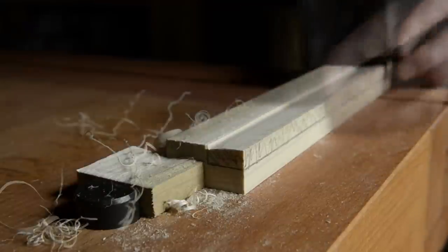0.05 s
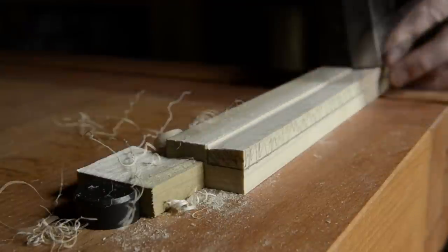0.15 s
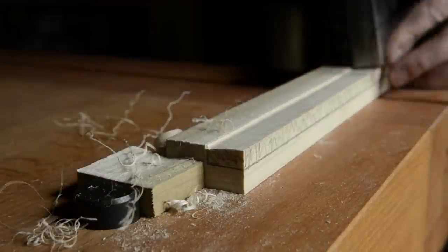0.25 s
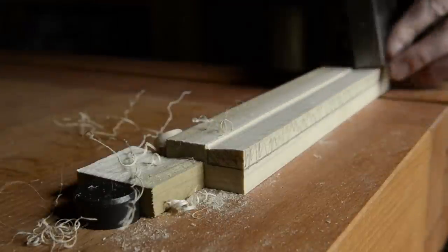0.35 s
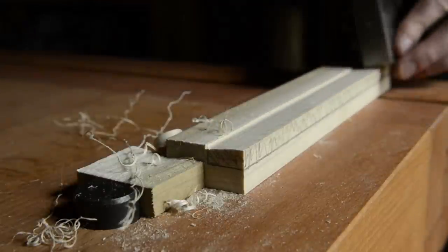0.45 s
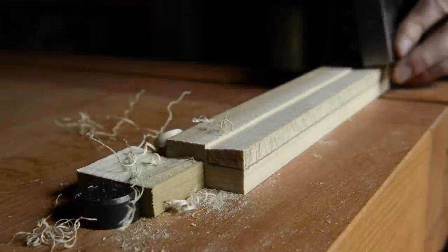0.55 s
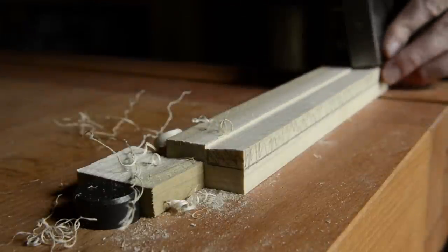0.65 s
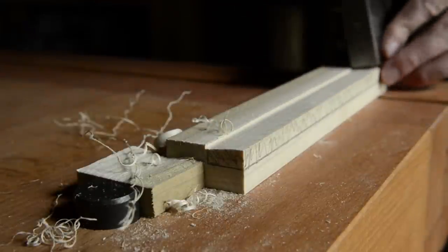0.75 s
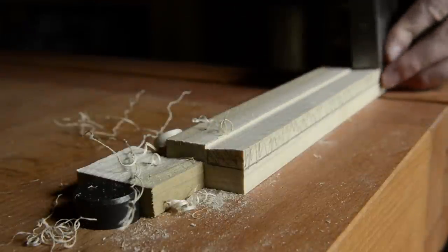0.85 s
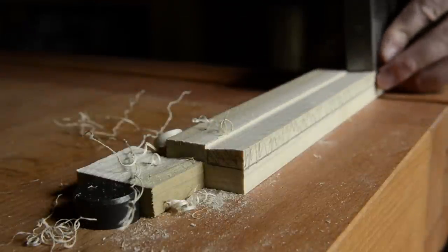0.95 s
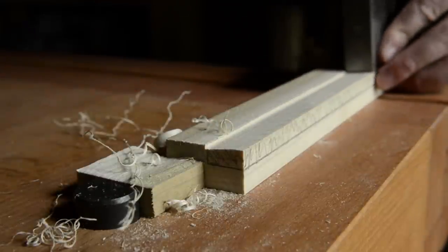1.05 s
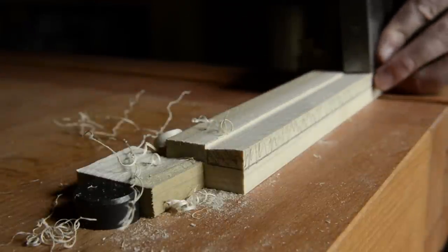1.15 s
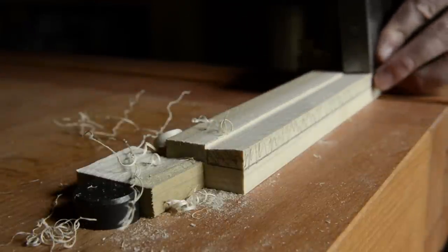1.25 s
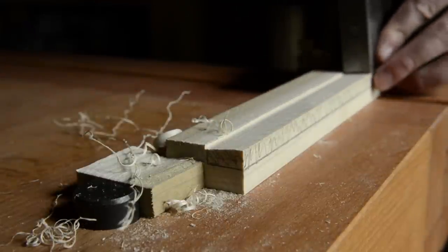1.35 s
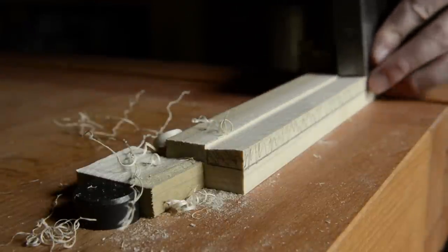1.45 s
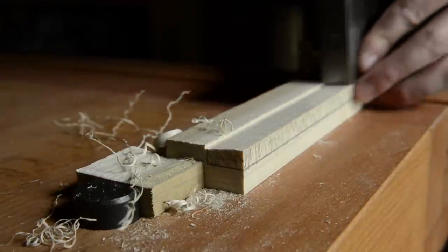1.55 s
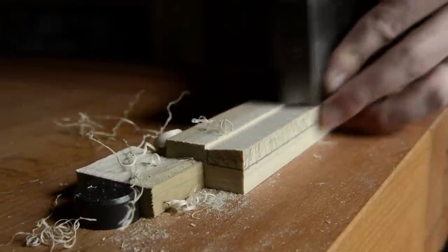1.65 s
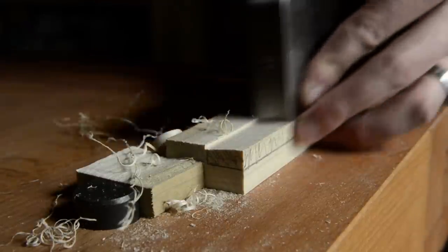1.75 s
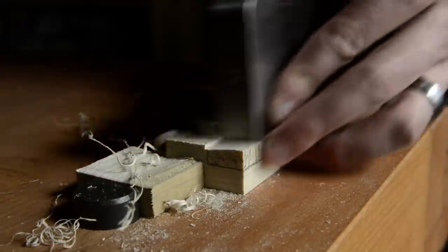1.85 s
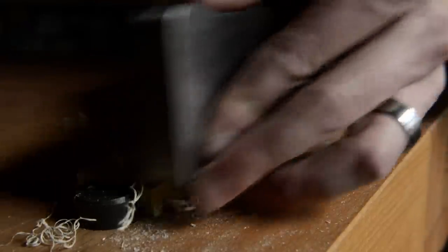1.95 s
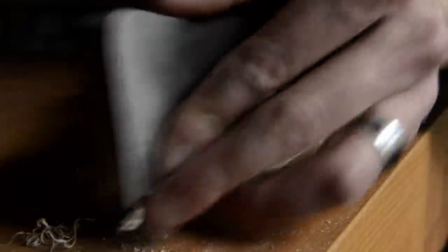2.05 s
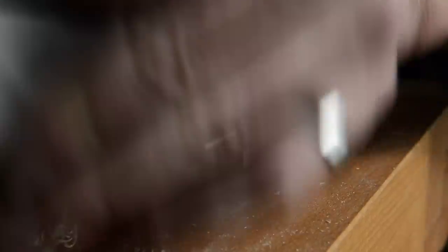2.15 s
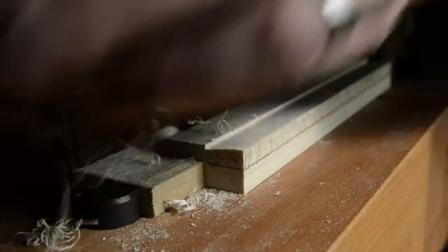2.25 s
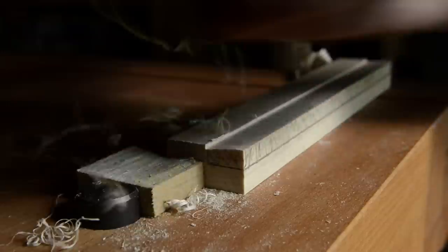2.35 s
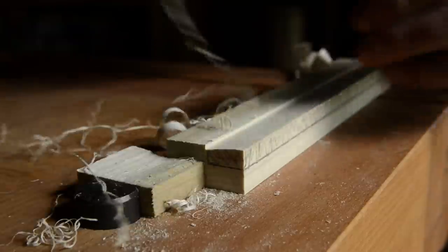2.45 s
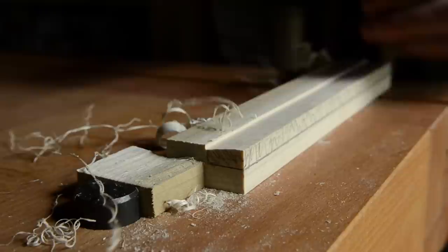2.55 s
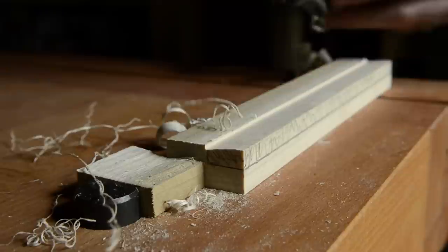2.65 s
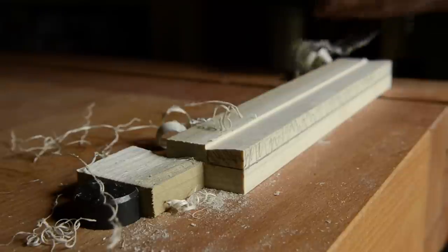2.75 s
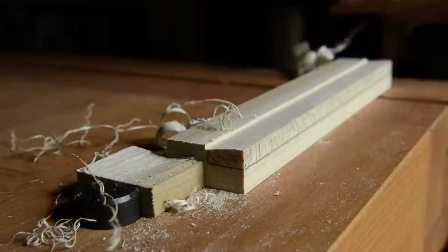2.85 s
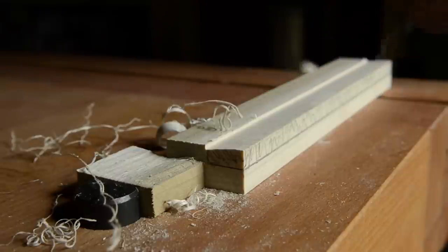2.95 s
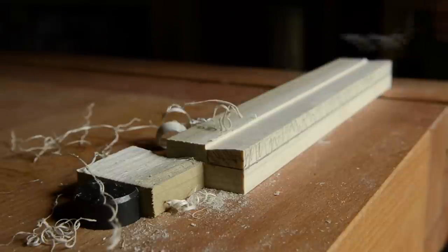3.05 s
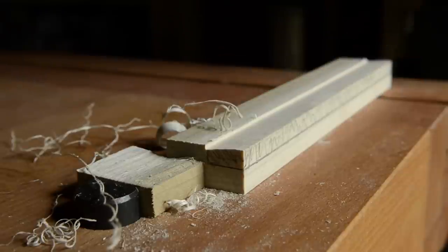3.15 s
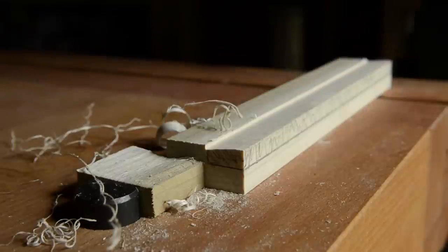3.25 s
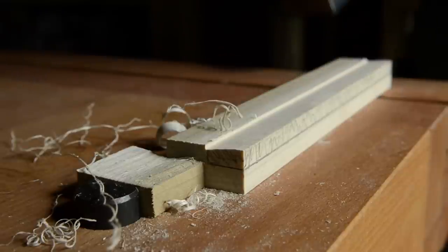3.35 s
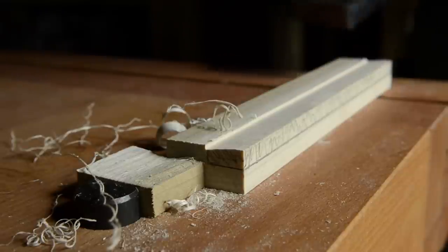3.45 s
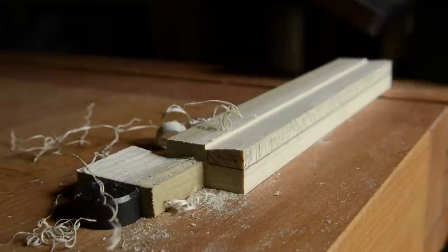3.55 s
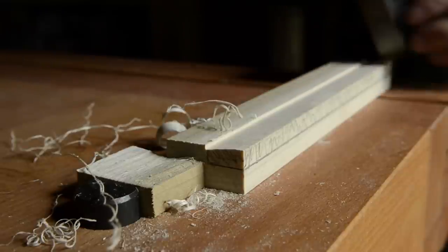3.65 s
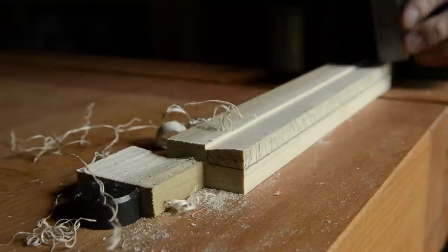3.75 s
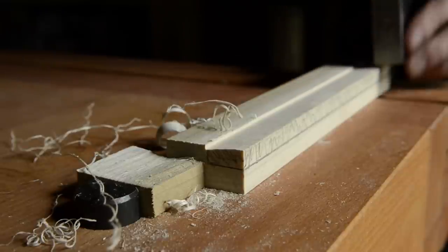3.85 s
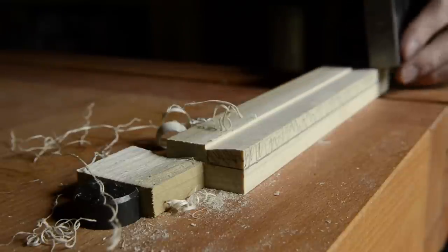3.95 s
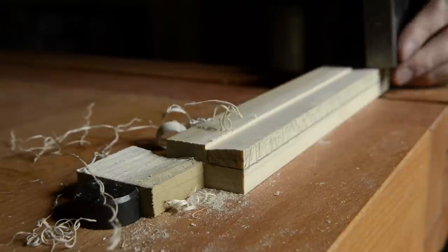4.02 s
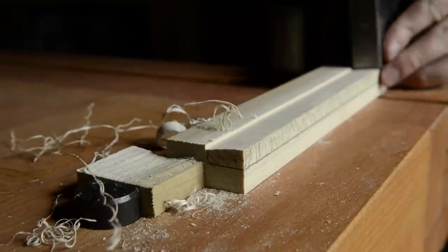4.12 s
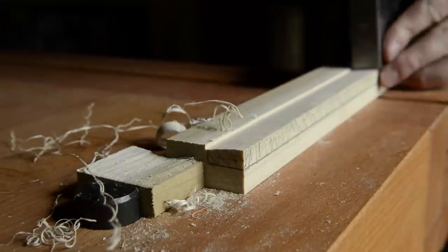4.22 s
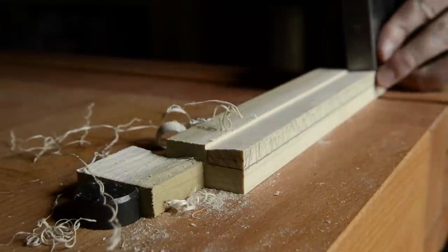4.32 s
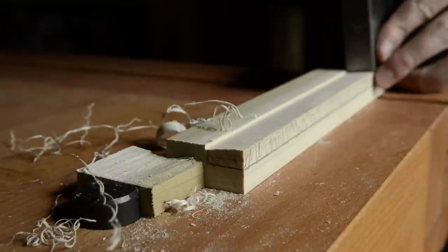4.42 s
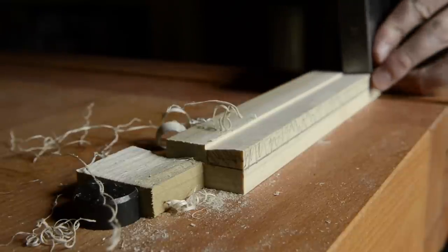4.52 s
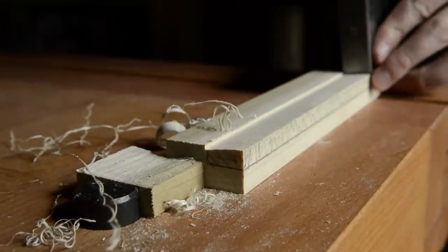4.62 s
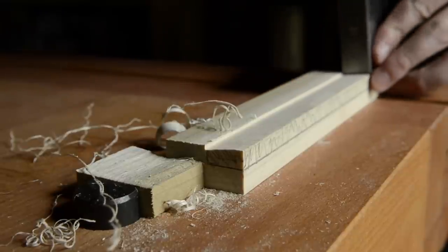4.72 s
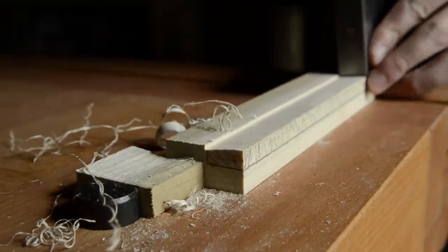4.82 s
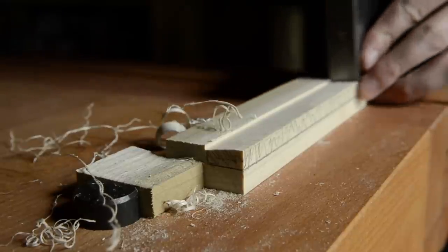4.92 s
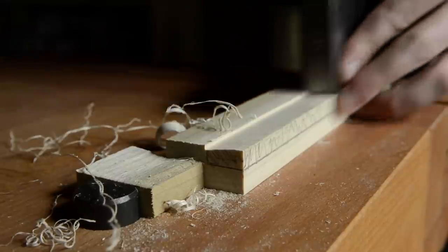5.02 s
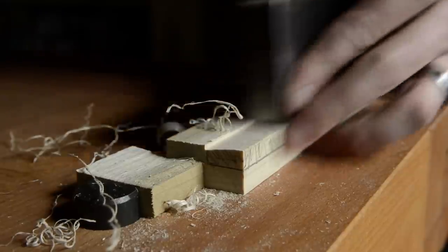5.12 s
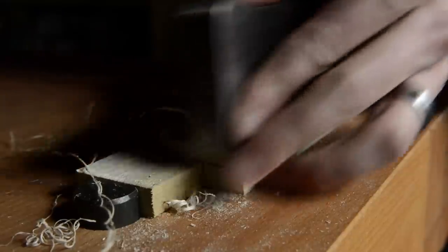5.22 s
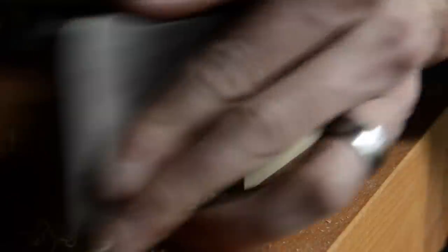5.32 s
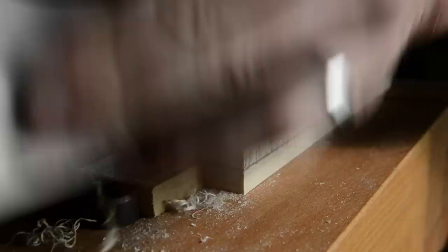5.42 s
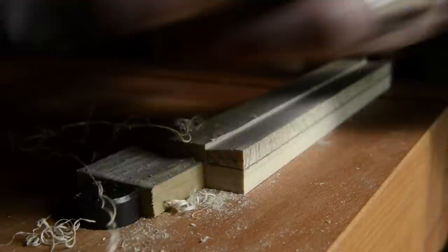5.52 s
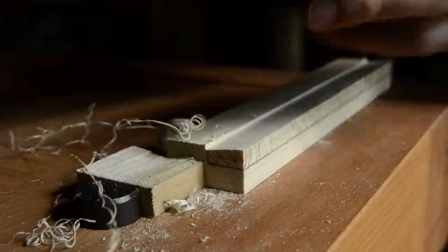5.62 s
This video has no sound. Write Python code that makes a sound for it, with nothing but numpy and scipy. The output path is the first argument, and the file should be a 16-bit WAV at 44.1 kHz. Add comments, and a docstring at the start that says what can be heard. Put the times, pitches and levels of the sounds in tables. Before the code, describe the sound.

A steel scraping blade knocks onto a wooden board, rasps along its edge in two harsh strokes, with knocks and crackling shavings between.

```python
"""Workshop hum, then a steel scraping blade knocking on a narrow board as it is set down on a workbench.
It slides lightly, then is drawn along the edge twice: torn fibres drive resonances of blade and board.
The blade drops off the end and knocks on the wood; knocks are decaying modes plus filtered noise bursts.
Between the strokes the tool is seated again and fingers pull crackling shavings off it: noise grains and snaps."""
import sys
import numpy as np
from scipy import signal
from scipy.fft import rfft, irfft, next_fast_len
from scipy.io import wavfile
from scipy.ndimage import map_coordinates

SR = 44100
rng = np.random.default_rng(int(sys.argv[2]) if len(sys.argv) > 2 else 0)


def transcribe(signal):
    """Save signal, clipped to [-1, 1], as a 16-bit WAV file at the path in sys.argv[1]."""
    frames = np.atleast_2d(signal).T
    limited = np.clip(frames, -1, 1)
    pcm = np.round(limited * 32767).astype(np.int16)
    wavfile.write(sys.argv[1], SR, pcm)


N = 250472
TIME = np.arange(N) / SR

# Levels are relative settings, ahead of the mix gains, room and microphone.
# hum and whine tones: [f/Hz, level/dB]
HUM_TONES = [(59.2, -62.5), (242.2, -64), (398.4, -69), (1814, -69), (3295, -73.5), (3634, -71)]
# still-air noise spectrum: [f/Hz, density/dB]
AIR_SPECTRUM = [(15, -24), (25, 0), (119, -10.5), (253, -10), (331, -9.5), (389, -10.5), (631, -13),
                (703, -12.5), (1110, -15.5), (1800, -16), (1950, -19), (3630, -23.5), (4150, -30),
                (8810, -29.5), (15500, -50)]
# tool on wood: [t/s, level/dB, then boom/dB, wood/dB, crack/dB, steel/dB re level]
KNOCK_EVENTS = [(0.146, -4, -22.5, -10.5, -17, -30), (0.641, -14, -19, -14, -27, -15),
                (1.233, -23, -27, -10.5, -40, -33), (2.095, -9.5, -32.5, -16, -12, -18),
                (2.167, -17.5, -35, -31, -10, -22), (3.606, -40, -18, -6, -12.5, -23),
                (3.921, -20, -18.5, -8, -16.5, -29.5), (4.135, -22, -11, -17, -25, -17),
                (4.525, -13.5, -25.5, -12, -34, -37), (5.354, -12, -37, -16.5, -19.5, -18)]
# board slapping down on the bench: [t/s, level/dB, f/Hz, t60/s]
SLAP_EVENTS = [(0.651, -24, 219.5, 0.17), (0.668, -36, 168, 0.089), (1.264, -24, 394, 0.052),
               (2.097, -9, 235.2, 0.115), (2.099, -8.5, 378, 0.059), (3.607, -34, 942, 0.095),
               (4.545, -17.5, 432, 0.05), (5.361, -18, 235, 0.13)]
# blade set ringing by a catch on the board's end: [t/s, level/dB, favoured f/Hz]
RING_EVENTS = [(0.641, -31, 1780), (4.136, -41.5, 3343)]
# low bench modes: [f/Hz, level/dB, t60/s]
BENCH_MODES = [(96, -14, 0.17), (129, -10, 0.25), (146.4, -4, 0.16), (161.9, -0.5, 0.19),
               (178.6, -10.5, 0.12), (228.3, -2.5, 0.12), (274.5, -3, 0.092)]
# modes of the board on the bench: [f/Hz, level/dB, t60/s]
BOARD_MODES = [(338.4, 5.5, 0.043), (392.5, 0, 0.11), (461, 0.5, 0.098), (522.4, -4, 0.12),
               (587, -3.5, 0.13), (679, 2.5, 0.053), (780, -17, 0.15), (970, -22, 0.22), (1080, -5.5, 0.2),
               (1300, 5, 0.053), (1640, -24, 0.11), (1750, -27, 0.19), (1960, -5, 0.14), (2580, -26, 0.05),
               (3310, -19, 0.17), (3370, -11, 0.24), (3950, -23, 0.42)]
# steel blade modes, damped by the fingers: [f/Hz, level/dB, t60/s]
BLADE_MODES = [(1630, 1, 0.14), (1825, -2, 0.14), (3150, 0, 0.12), (3350, -3, 0.18), (4260, -6.5, 0.23),
               (5670, -9, 0.13), (6630, -3.5, 0.12), (6820, -16, .15), (7402, -9, 0.19), (7800, -9, .18),
               (8900, 0, 0.26), (9950, -2, 0.18), (10800, -4.5, 0.047), (12030, -4.5, 0.15)]
# blade sliding lightly on the board: [t/s, hold/s, rub/dB, hiss/dB]
SLIDE_EVENTS = [(0.365, 0.0084, -49, -62), (0.464, 0.028, -33.5, -43.5), (0.618, 0.019, -30.5, -40.5),
                (4.038, 0.074, -43, -49), (4.307, 0.067, -48.5, -61), (4.496, 0.06, -43.5, -50),
                (4.638, 0.11, -53.5, -70), (4.774, 0.17, -41.5, -49.5), (5.442, 0.15, -49, -63)]
# resonances of lightly rubbing blade and board: [f/Hz, width/Hz, level/dB]
RUB_RESONANCES = [(146, 87, 8), (171, 53, 2.5), (475, 124, 9.5), (765, 62, 6), (911, 50, 10.5),
                  (1064, 62, 6), (1494, 150, 2.5), (1780, 74, 10), (1890, 20, 0), (2270, 100, -8),
                  (3330, 77, 1), (4010, 140, -0.5)]
# treble of the light rubbing: [f/Hz, density/dB]
SKIM_SPECTRUM = [(3000, -45), (4300, 0), (4900, 15), (5400, -12), (6300, -5), (7200, 2), (8300, 5),
                 (10000, 2), (11000, 0), (12300, -13), (13500, -24), (16000, -36)]
# fingers brushing over the steel; the last row is the room's tail after a sharp click:
# [t/s, level/dB, rise/s, t60/s]
BRUSH_AND_TAIL_EVENTS = [(0.78, -43, 0.0041, 0.062), (0.89, -32.5, 0.018, 0.23), (1.02, -52.5, 0.002, 0.41),
                         (3.524, -41, 0.0015, 0.31), (3.768, -37, 0.00075, 0.29)]
# noise of fingers wiping the steel, also used for that tail: [f/Hz, density/dB]
WIPE_SPECTRUM = [(240, -41), (400, -21), (719, -6), (786, -13), (1160, -6.5), (1480, -12), (1800, -4.5),
                 (2580, -7), (3380, -6), (4990, -10), (5630, -11), (6440, -10), (8570, -5), (14500, -30.5)]
# handfuls of shavings crumpled: [t of tightest squeeze/s, level/dB, rise/(dB/s), fall/(dB/s)]
CRUMPLE_EVENTS = [(1.1, -51, 550, 200), (2.18, -37, 1400, 140), (2.49, -64, 300, 35), (3.051, -37, 98, 75),
                  (3.06, -28.5, 2800, 750)]
# crackle of the shavings: [f/Hz, density/dB]
CRACKLE_SPECTRUM = [(200, -9), (700, -0.5), (1300, -6), (1750, 3.5), (2000, -3), (2270, 3.5), (2750, -2),
                    (3300, 1), (3800, 0), (4400, 2.5), (6400, 0.5), (9800, 5), (11500, -3.5), (16000, -19)]
# loudest snaps of shavings, and the crisp click of the knock at 2.167 s: [t/s, level/dB, treble/dB re level]
SNAP_AND_CLICK_EVENTS = [(1.0172, -16, -14), (2.167, -16, -32), (2.213, -21, -19), (2.2886, -25.5, -18.5),
                         (2.2965, -25, -17), (2.4805, -34.5, -9), (2.5172, -40, -11), (2.9336, -33, -4),
                         (2.9656, -26, 0), (2.9967, -22.5, -9), (3.0371, -20, 4), (3.1905, -26, -8),
                         (3.7673, -19, -5.5)]
# cuts: [first touch t/s, dig-in/s, length/s, pressure/dB, swell/(dB/s), bite/dB, hiss/dB, bend/dB re pressure]
CUT_EVENTS = [(1.428, 0.083, 0.53, -28, 12.9, -3.5, -11, -8.5),
              (4.866, 0.099, 0.38, -22.5, 4.1, -2.5, -10.5, -16.5)]
# blade and board under the cut: [f/Hz, width/Hz, level/dB]
CUT_RESONANCES = [(164, 31, -14), (497, 14, -11), (554, 22, -1), (577, 4, 7.5), (655, 11, -0.5),
                  (695, 37, 5), (785, 11, -3), (923.3, 21, 0.5), (950, 8, 6), (1137, 185, -8),
                  (1276, 29, -1), (1357, 25, -7.5), (1420, 5.2, 0), (1669, 78, -7.5), (1770, 38, 4),
                  (1935, 2.8, -4), (2300, 12.6, -3), (2750, 250, -14), (3116, 74, -11)]
# tearing fibres: [f/Hz, density/dB]
FIBRE_SPECTRUM = [(100, -37), (165, -23), (270, -5), (450, -2), (1200, -14), (1600, -4), (2050, -13.5),
                  (3300, -14), (4500, -26), (5500, -32), (8000, -62)]
# hiss of the peeling shaving: [f/Hz, density/dB]
HISS_SPECTRUM = [(2500, -4), (4000, 3.5), (4700, 2.5), (5300, 3), (6300, -3), (7300, 4.5), (9300, 1),
                 (11300, -8), (12800, -5), (14500, -21), (16000, -26)]
# edge chattering on one resonance: [middle t/s, length/s, f/Hz, level/dB]
CHATTER_EVENTS = [(1.574, 0.034, 660, -31), (1.935, 0.069, 690, -19), (1.982, 0.047, 923, -15),
                  (1.987, 0.059, 1287, -23.5), (4.88, 0.14, 3200, -48.5), (4.994, 0.047, 678, -23),
                  (5.135, 0.069, 1786, -21), (5.209, 0.017, 935, -12.5), (5.235, 0.092, 1770, -19.5),
                  (5.306, 0.026, 1310, -21), (5.302, 0.05, 1696, -25)]
# decay of the workshop's diffuse answer: [f/Hz, t60/s]
ROOM_DECAY = [(100, 0.34), (500, 0.23), (2000, 0.21), (6000, 0.29), (14000, 0.29)]
# microphone response: [f/Hz, gain/dB]
MIC_RESPONSE = [(20, -17), (42, -11), (54, 3.5), (64, -2), (78, -7.5), (100, 3.5), (125, 0.5), (5350, 0.5),
                (5560, -7.5), (5730, -9), (5900, -2), (6200, 1), (6750, -0.5), (6890, -14), (7050, -1.5)]

MIC_TOP_HZ = 15900
RATTLE_DB, FAVOUR_DB = -5, 10.5  # rattle after each crack; lift of the blade mode nearest the favoured pitch
SLIDE_RISE_DB_PER_S, SLIDE_FALL_DB_PER_S = 520, 254
SING_WIDTH_HZ = 170  # of the blade modes while the blade is on the wood
SMALL_SNAPS_PER_S, SMALL_SNAP_DB, SMALL_TREBLE_DB = 22, 12, -8  # lesser snaps: rate, level re rustle, treble
TOUCH_DB, LIFT_DB_PER_S = -24, 291  # pressure at first touch re full cut; rate of letting go
SURGE_DB, SURGE_KNOTS_PER_S = 1.7, 22  # uneven resistance of the grain
BITE_LAG_S = 0.056  # bite digs in later than pressure
BITE_FOLLOWS, HISS_FOLLOWS, BEND_FOLLOWS = 0.84, 0.7, 0.92  # dB per dB of pressure change
HELD_HZ, FREE_HZ = 387, 232  # board bending mode: blade in the middle, blade at the free end
SINK_LEAD_S, SINK_SCALE_S = 0.0303, 0.0304  # centre of the glide ahead of the cut's end; its time scale
MODE_SHIFT_DB, MODE_SHIFT_KNOTS_PER_S = 2, 14  # resonances swell and fade as the edge passes their nodes
SING_DB = -5  # blade ringing re shaving hiss


def amp(db):
    """Decibels to gain."""
    return 10 ** (np.asarray(db) / 20)


def unit(x):
    """x at rms 1."""
    return x / np.sqrt(np.mean(x ** 2) + 1e-20)


def early(x):
    """x at rms 1 over its first 40 ms."""
    return x / np.sqrt(np.mean(x[:round(0.04 * SR)] ** 2))


def along(points, hz):
    """(Hz, value) points read on a log-frequency axis."""
    f, v = np.transpose(points)
    return np.interp(np.log(hz + 1), np.log(f), v)


def wobble(knots_per_s):
    """Smooth random curve through normal-distributed knots."""
    knots = rng.standard_normal(int(N * knots_per_s / SR) + 4)
    return map_coordinates(knots, [TIME * knots_per_s])


def filtered(x, response):
    """x times a response of frequency."""
    m = next_fast_len(N + SR // 2)
    return irfft(rfft(x, m) * response(np.fft.rfftfreq(m, 1 / SR)), m)[:N]


def coloured(x, spectrum):
    """x through a (Hz, dB) spectrum, at rms 1."""
    return unit(filtered(x, lambda hz: amp(along(spectrum, hz))))


def band(x, lo_hz, hi_hz, order=3):
    """Causal Butterworth band-pass."""
    edges_hz = [lo_hz, min(hi_hz, SR / 2 - 1)]
    return signal.sosfilt(signal.butter(order, edges_hz, "band", fs=SR, output="sos"), x)


def grains(per_s, spread_db, smooth):
    """Tiny breaks of random size and sign over a share of smooth friction noise, at rms 1."""
    sizes = rng.choice([-1, 1], N) * amp(spread_db * rng.standard_normal(N))
    breaks = (rng.random(N) < per_s / SR) * sizes
    return unit(unit(breaks) + smooth * rng.standard_normal(N))


def resonance(f, centre_hz, width_hz):
    """Complex response of one damped mode, 1 at its centre."""
    damping = 1j * f * width_hz
    return damping / (centre_hz * centre_hz - f * f + damping)


def resonate(x, modes):
    """x through summed (Hz, width, dB) resonances, at rms 1."""
    return unit(filtered(x, lambda f: sum(amp(db) * resonance(f, c, w) for c, w, db in modes)))


def ring(modes, t, rough=0):
    """Decaying struck modes of random strength and sign; roughness makes their phases wander."""
    out = np.zeros(len(t))
    for hz, db, t60 in modes:
        strength = amp(db + rng.normal(0, 3.2) - 60 * t / t60) * rng.choice([-1, 1])
        wander = rough * np.cumsum(rng.standard_normal(len(t))) / np.sqrt(SR)
        out += strength * np.sin(2 * np.pi * hz * t + wander)
    return out


def add(track, s, sound):
    """Lay a sound into a track at s seconds."""
    start = round(s * SR)
    track[start:start + len(sound)] += sound[:N - start]


def gesture(s, length, rise, fall):
    """Attack, hold, release in dB: 0 from s for length seconds, slopes in dB/s on either side."""
    return -abs(rise) * np.maximum(s - TIME, 0) - abs(fall) * np.maximum(TIME - s - length, 0)


def room(x, wet_db):
    """x plus a diffuse noise tail 4 ms later, decaying per band, scaled to keep about the same power."""
    hz, t, z = signal.stft(rng.standard_normal(SR // 2), SR, nperseg=256)
    decay = amp(-60 * t / along(ROOM_DECAY, hz)[:, None])
    tail = signal.istft(z * decay, SR, nperseg=256)[1]
    tail = np.pad(tail / np.linalg.norm(tail), (SR // 250, 0))
    wet = amp(wet_db) * signal.fftconvolve(x, tail)[:N]
    return (x + wet) / np.hypot(1, amp(wet_db))


def workshop():
    """Still air as shaped noise; mains hum and a faint electrical whine as phase-wandering sines."""
    out = amp(-54.5) * coloured(rng.standard_normal(N), AIR_SPECTRUM)
    for hz, db in HUM_TONES:
        out += amp(db) * np.sqrt(2) * np.sin(2 * np.pi * hz * TIME + 0.16 * wobble(2.3))
    return out


def knocks():
    """Blows boom in the bench, ring the board and crack on contact; board slaps and blade rings join them."""
    out, t = np.zeros(N), np.arange(SR // 2) / SR
    for s, db, boom_db, wood_db, crack_db, steel_db in KNOCK_EVENTS:
        add(out, s, amp(db) * blow(t, boom_db, wood_db, crack_db, steel_db))
    for s, db, hz, t60 in SLAP_EVENTS:
        add(out, s, slap(t, db, hz, t60))
    for s, db, favoured_hz in RING_EVENTS:
        add(out, s, amp(db) * blade_ring(t, favoured_hz))
    return room(out, wet_db=-9.5)


def blow(t, boom_db, wood_db, crack_db, steel_db):
    """Bench and board modes under decaying noise bands for wood, crack and steel."""
    dying = lambda t60: early(amp(-60 * t / t60) * rng.standard_normal(len(t)))
    boom = early(ring(BENCH_MODES, t) * (1 - np.exp(-t / 0.0025)))

    modes = early(band(ring(BOARD_MODES, t), 259, 1056, order=5))
    thud = early(band(dying(0.12), 221, 1040, order=6))
    wood = early(modes + 0.63 * thud)

    # a crack stronger against the wood reaches higher
    reach_hz = np.clip(4400 * 2 ** ((crack_db - wood_db + 5) / 6), 1300, 4400)
    rattle = amp(RATTLE_DB) * (0.16 * early(ring(BOARD_MODES, t)) + dying(0.26))
    crack = band(dying(0.049) + rattle, 910, reach_hz, order=4)
    crack = early(crack + 2.1 * band(dying(0.11), 1110, 1780))

    steel = early(band(dying(0.038) + amp(RATTLE_DB - 2) * dying(0.21), 5560, 10300))
    low = amp(boom_db + 4.5) * boom + amp(wood_db - 0.5) * wood
    return low + amp(crack_db - 1.0) * crack + amp(steel_db - 4.0) * steel


def slap(t, db, hz, t60):
    """Board slapping on the bench: one decaying mode with a soft onset."""
    return amp(db - 60 * t / t60) * np.sin(2 * np.pi * hz * t) * (1 - np.exp(-t / 0.0021))


def blade_ring(t, favoured_hz):
    """Blade modes with wandering phase, the one nearest the favoured pitch lifted."""
    nearest = min((hz for hz, db, t60 in BLADE_MODES), key=lambda hz: abs(hz - favoured_hz))
    modes = [(hz, db + FAVOUR_DB * (hz == nearest), t60) for hz, db, t60 in BLADE_MODES]
    return early(ring(modes, t, rough=8.6))


def slides():
    """Without pressure the edge only rubs: friction grains drive the board, and the steel sings faintly."""
    rub, hiss = np.zeros((2, N))
    for s, length, rub_db, hiss_db in SLIDE_EVENTS:
        touch_db = gesture(s, length, SLIDE_RISE_DB_PER_S, SLIDE_FALL_DB_PER_S)
        rub += amp(rub_db + touch_db)
        hiss += amp(hiss_db + touch_db)
    friction = grains(per_s=2500, spread_db=3, smooth=0.8) * amp(1.3 * wobble(70))
    board = band(resonate(friction, RUB_RESONANCES), 49, 6200, order=2)
    treble = amp(-2) * coloured(friction, SKIM_SPECTRUM) + amp(-4.5) * singing(friction)
    return room(amp(-2.0) * rub * board + hiss * treble, wet_db=-9.5)


def singing(friction):
    """Blade modes, broadened by contact, shaken by friction."""
    modes = [(hz, SING_WIDTH_HZ, db) for hz, db, t60 in BLADE_MODES]
    return unit(band(resonate(friction, modes), 1980, 10400))


def shavings():
    """Crumpled curls crackle in dense grains; shaped noise makes the finger brushes and a click's tail."""
    breaks = grains(per_s=2800, spread_db=5.0, smooth=0.44) * amp(3.9 * wobble(150))
    crackle = amp(-1.0) * crumpling() * coloured(breaks, CRACKLE_SPECTRUM)
    level = np.zeros(N)
    for s, db, rise_s, t60 in BRUSH_AND_TAIL_EVENTS:
        age = np.maximum(TIME - s, 0)
        level += amp(db - 60 * age / t60) * (1 - np.exp(-age / rise_s))
    brushes_and_tail = level * coloured(rng.standard_normal(N), WIPE_SPECTRUM)
    return room(crackle + brushes_and_tail, wet_db=-9.5)


def crumpling():
    """Rustle gain: each handful tightens and loosens."""
    return sum(amp(db + gesture(s, 0, rise, fall)) for s, db, rise, fall in CRUMPLE_EVENTS)


def snaps():
    """Dry curls snap, and one knock clicks, in short fluttering noise bursts; lesser random snaps follow the rustle."""
    out, t = np.zeros(N), np.arange(SR // 20) / SR
    rustle_db = np.minimum(20 * np.log10(crumpling() + 1e-9), -43)
    moments = np.flatnonzero(rng.random(N) < SMALL_SNAPS_PER_S / SR)
    lesser = [(i / SR, rustle_db[i] + SMALL_SNAP_DB, SMALL_TREBLE_DB) for i in moments]
    for s, db, treble_db in list(SNAP_AND_CLICK_EVENTS) + lesser:
        decay = amp(-60 * t / 0.0032) + amp(-11.0 - 60 * t / 0.021)  # snap, then flutter
        burst = rng.standard_normal(len(t)) * decay
        treble = amp(treble_db + 12.5) * band(burst, 7250, 9900, order=2)
        snap = band(burst, 1430, 4400, order=2) + treble
        add(out, s, amp(db + 2.5) * snap / np.abs(snap).max())
    return room(out, wet_db=-9)


def cuts():
    """Uneven catches of tearing fibres shake board and blade while the shaving hisses; all follow pressure."""
    pressure, bite, hiss, bend = strokes()
    catches = amp(2.2 * wobble(170))
    tearing = grains(per_s=1300, spread_db=4.5, smooth=0.64) * catches
    fibres = coloured(grains(per_s=1200, spread_db=4.0, smooth=0.66) * catches, FIBRE_SPECTRUM)
    body = travelling(tearing, CUT_RESONANCES) + amp(-9.0) * fibres
    low = amp(-3.0) * pressure * unit(band(body, 160, 1070, order=5))
    high = amp(-1.0) * bite * unit(band(body, 976, 3470, order=4))

    peeling = grains(per_s=2700, spread_db=2.0, smooth=1.0) * catches ** 0.39
    shaking = grains(per_s=2000, spread_db=0.5, smooth=0.66) * catches ** 0.35
    shaving = coloured(peeling, HISS_SPECTRUM) + amp(SING_DB) * singing(shaking)
    return low + high + room(amp(0.88) * hiss * shaving, wet_db=-9.0) + bend + chatter()


def strokes():
    """Gains of pressure, bite and hiss, and the bending tone: dig in, swell with surges, let go."""
    pressure, bite, hiss, bend = np.zeros((4, N))
    for s, dig_s, length, db, swell, bite_db, hiss_db, bend_db in CUT_EVENTS:
        age = TIME - s
        end_s = s + dig_s + length
        touching = np.clip(age / 0.004, 0, 1)
        digging = lambda rise_s: TOUCH_DB * np.clip(1 - age / rise_s, 0, 1)
        lift = LIFT_DB_PER_S * np.maximum(age - dig_s - length, 0)
        surge = SURGE_DB * wobble(SURGE_KNOTS_PER_S)
        held = swell * np.clip(age - dig_s, 0, length) - lift + surge
        push = digging(dig_s) + held
        late_push = digging(dig_s + BITE_LAG_S) + held
        pressure += touching * amp(db + push)
        bite += touching * amp(db + bite_db + BITE_FOLLOWS * late_push)
        hiss += touching * amp(db + hiss_db + HISS_FOLLOWS * push)
        bend += touching * amp(db + bend_db + BEND_FOLLOWS * push) * bending(end_s, width_hz=88)
    return pressure, bite, hiss, bend


def bending(end_s, width_hz):
    """The board's lowest mode sinks as the blade nears the free end."""
    near_end = (1 + np.tanh((TIME - end_s + SINK_LEAD_S) / (2 * SINK_SCALE_S))) / 2
    return narrow(HELD_HZ + (FREE_HZ - HELD_HZ) * near_end, width_hz)


def narrow(hz, width_hz):
    """A resonance shaken at random: a tone of wandering strength and phase, at rms 1."""
    phase = 2 * np.pi * np.cumsum(hz * np.ones(N)) / SR
    return unit(wobble(width_hz) * np.cos(phase) + wobble(width_hz) * np.sin(phase))


def travelling(x, modes):
    """x through (Hz, width, dB) resonances of shifting strength as the contact moves along; rms 1."""
    m = next_fast_len(N + SR // 2)
    spectrum, f = rfft(x, m), np.fft.rfftfreq(m, 1 / SR)
    knots = np.arange(0, N / SR + 1, 1 / MODE_SHIFT_KNOTS_PER_S)
    out = np.zeros(N)
    for c, w, db in modes:
        levels = amp(db + MODE_SHIFT_DB * rng.standard_normal(len(knots)))
        out += np.interp(TIME, knots, levels) * irfft(spectrum * resonance(f, c, w), m)[:N]
    return unit(out)


def chatter():
    """The edge chatters on single resonances: tones that swell and fade, wavering in strength and phase."""
    out = np.zeros(N)
    for s, length, hz, db in CHATTER_EVENTS:
        swell = amp(db) * np.exp(-2 * ((TIME - s) / length) ** 2)
        tone = np.sin(2 * np.pi * hz * TIME + 1.2 * wobble(70))
        out += swell * amp(2.5 * wobble(120)) * tone
    return out


def scene():
    """Everything at one microphone beside the bench."""
    return (workshop() + knocks() + slides() + shavings() + snaps() + cuts())[None]


def record(dry):
    """The microphone colours the sound; the recorder keeps nothing above its band limit."""
    return filtered(dry[0], lambda hz: amp(along(MIC_RESPONSE, hz)) * (hz < MIC_TOP_HZ))[None]


dry = scene()
out = record(dry)
transcribe(out)
```